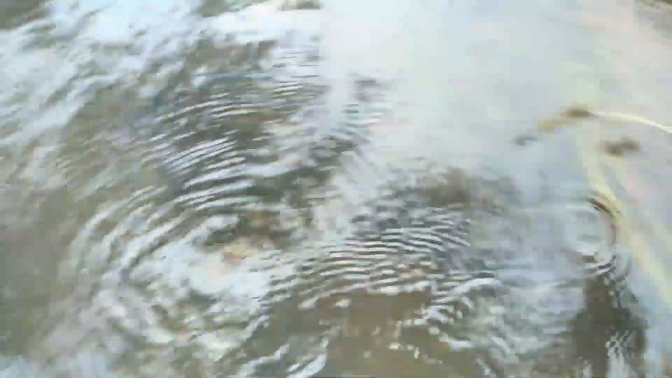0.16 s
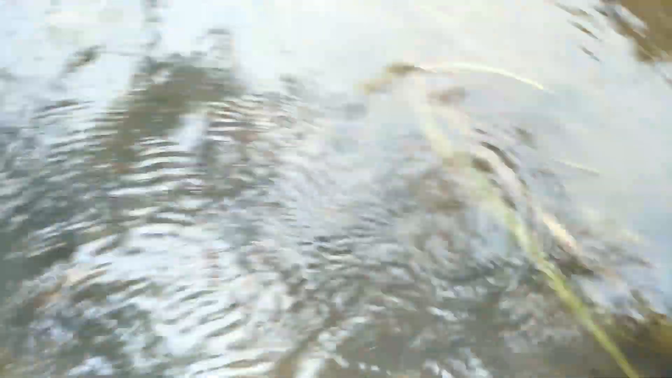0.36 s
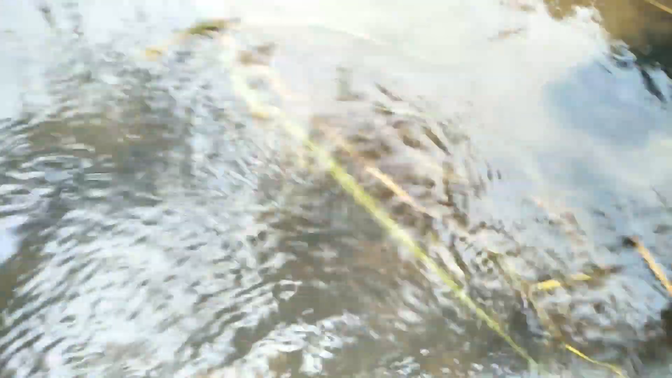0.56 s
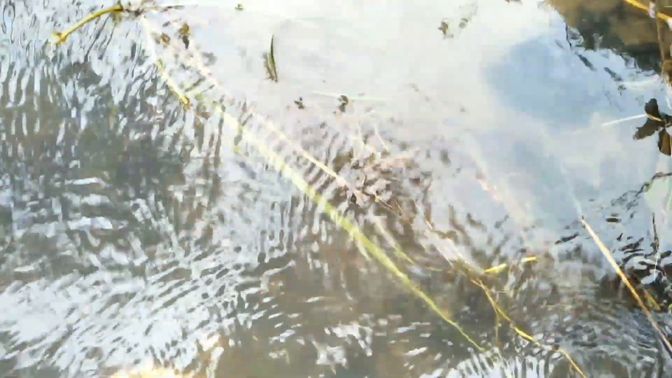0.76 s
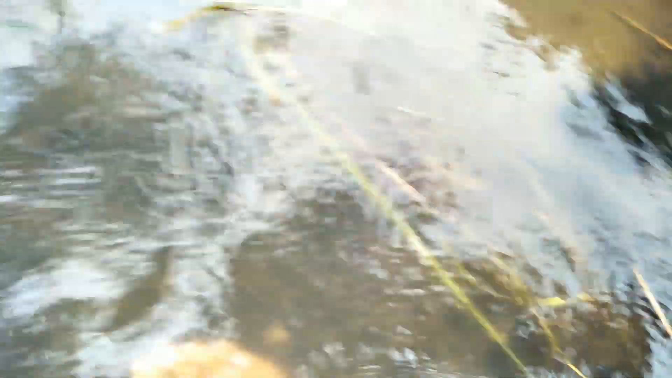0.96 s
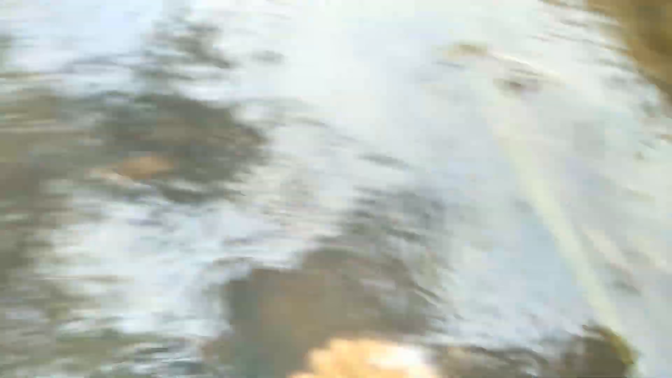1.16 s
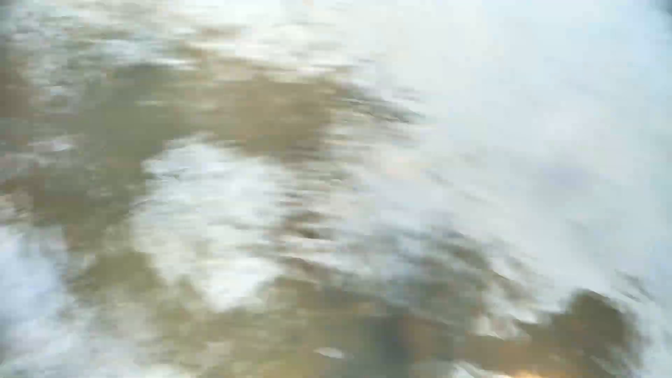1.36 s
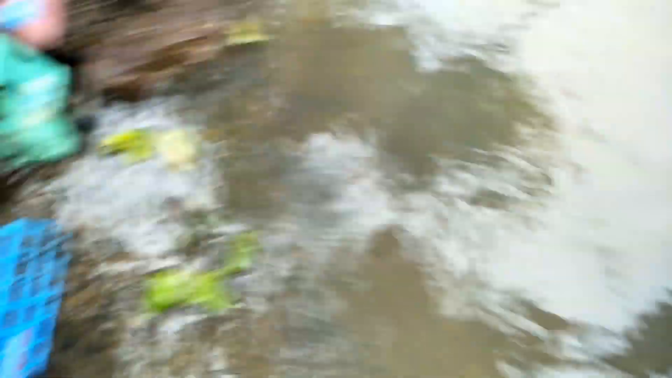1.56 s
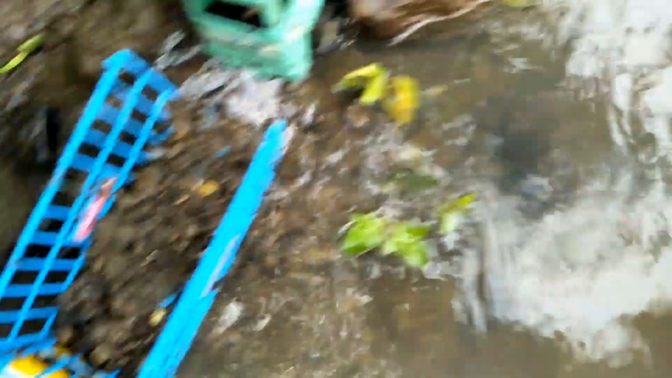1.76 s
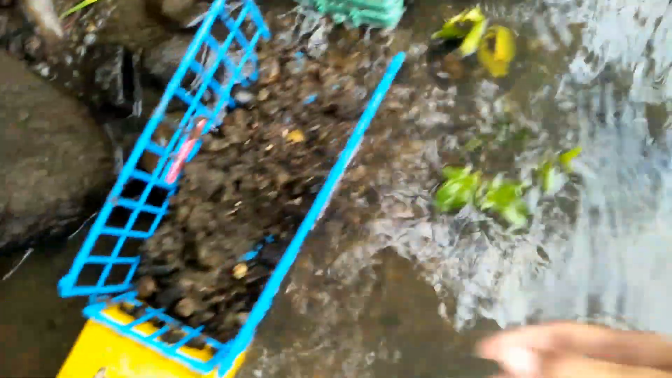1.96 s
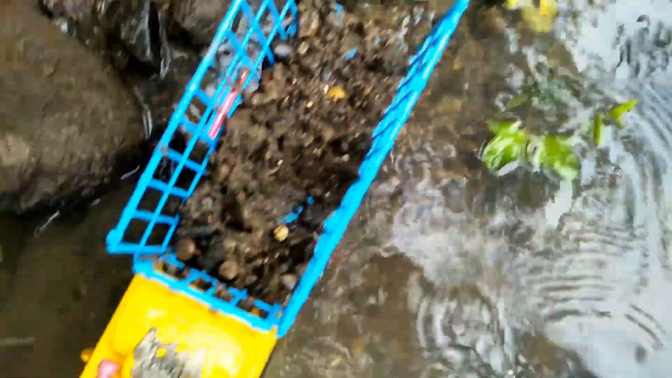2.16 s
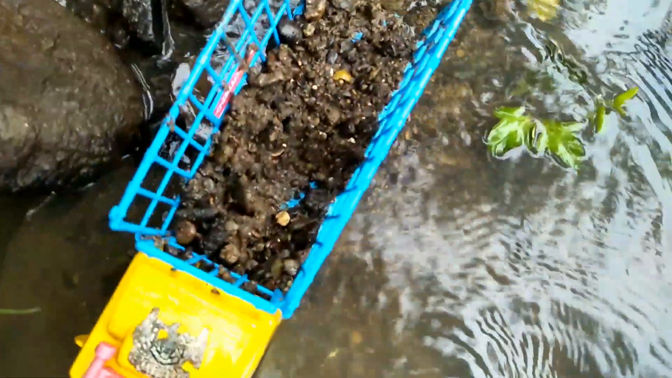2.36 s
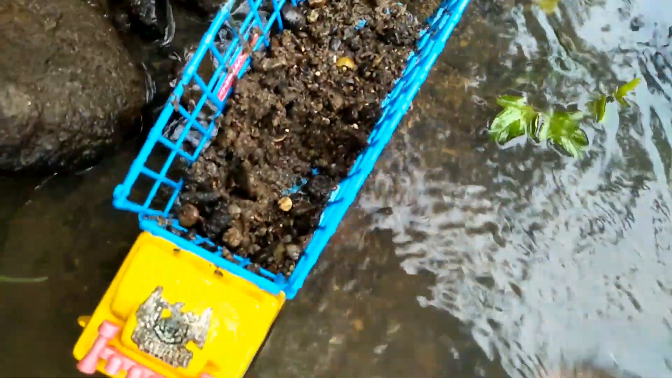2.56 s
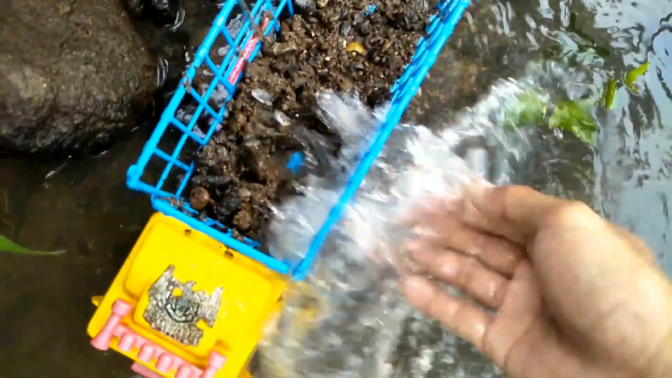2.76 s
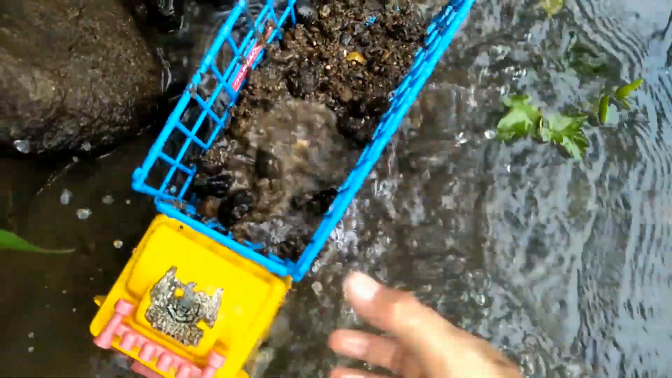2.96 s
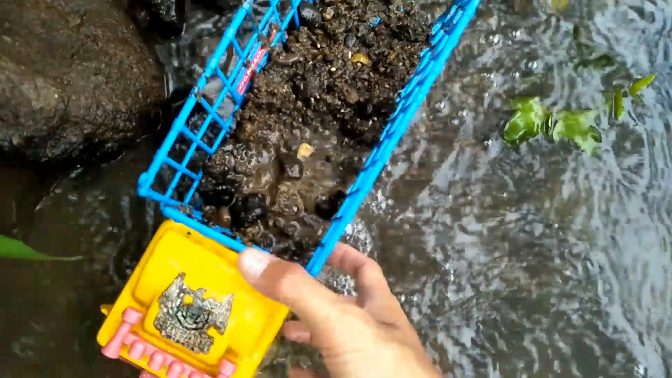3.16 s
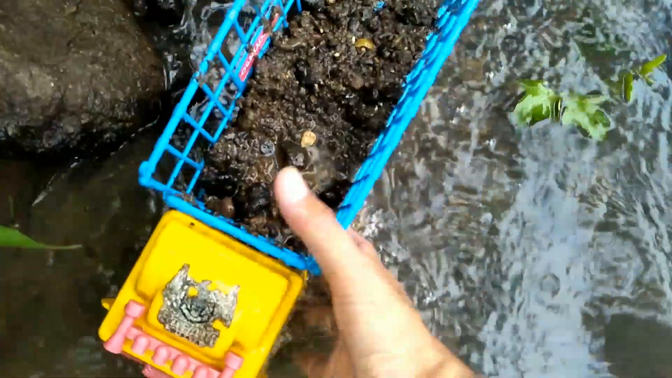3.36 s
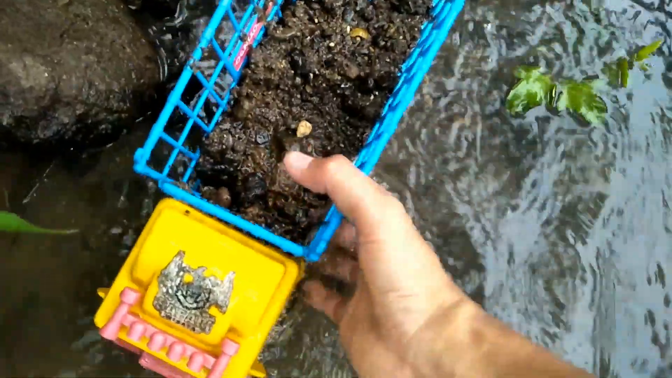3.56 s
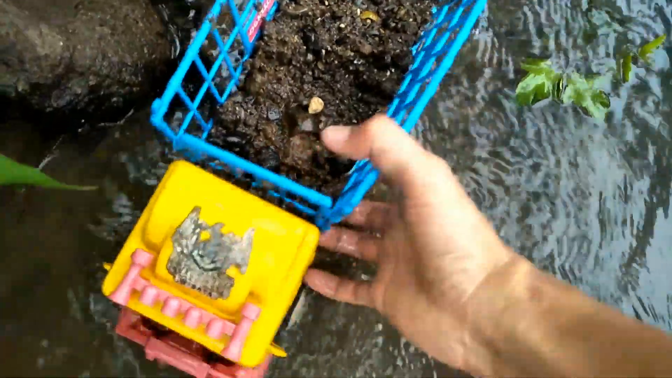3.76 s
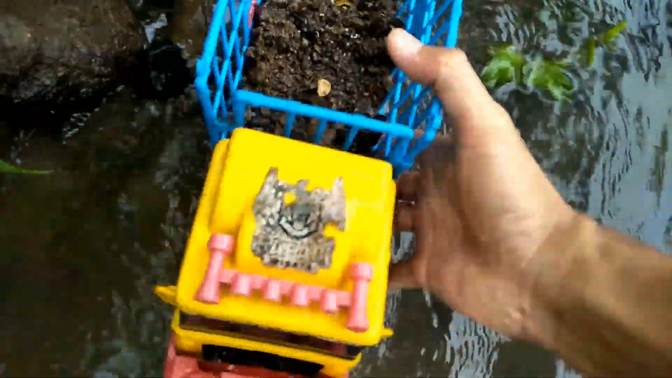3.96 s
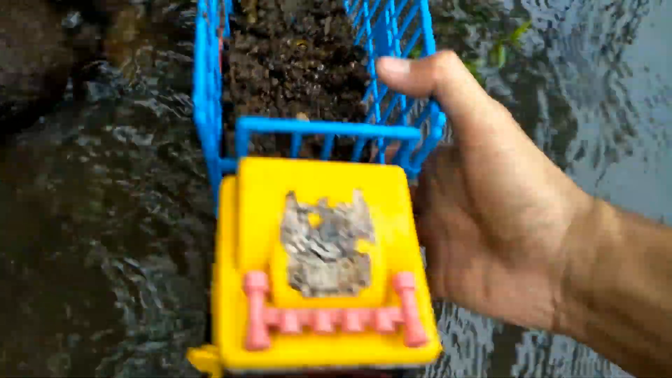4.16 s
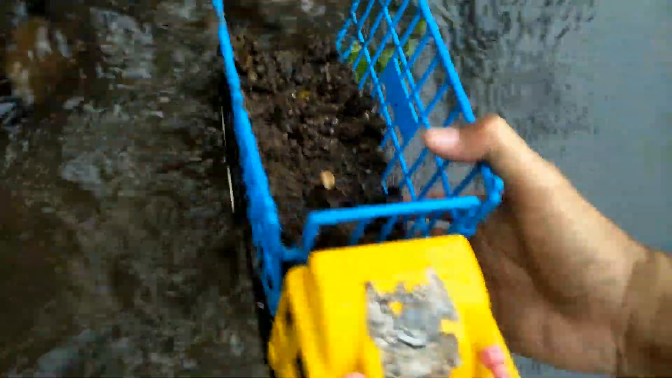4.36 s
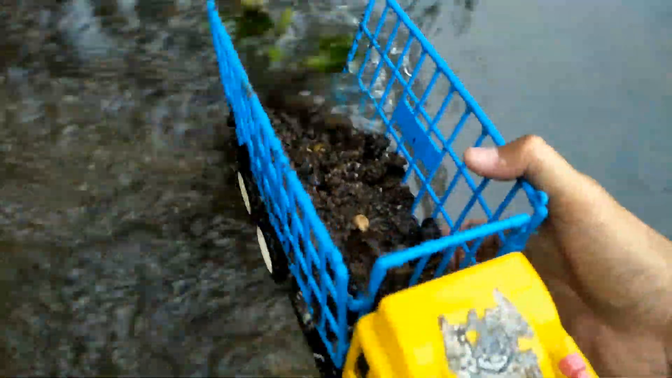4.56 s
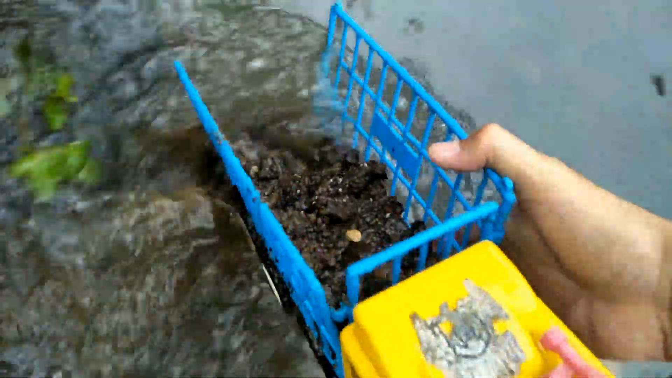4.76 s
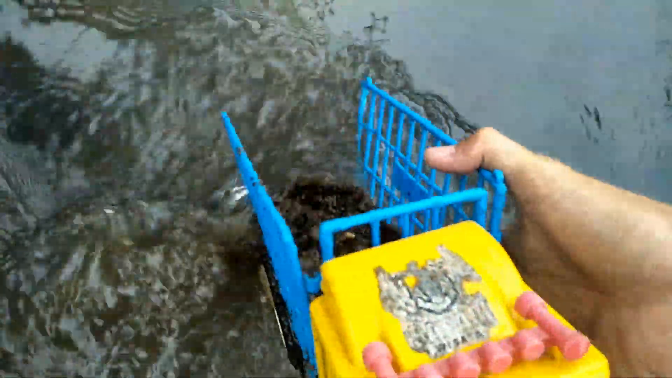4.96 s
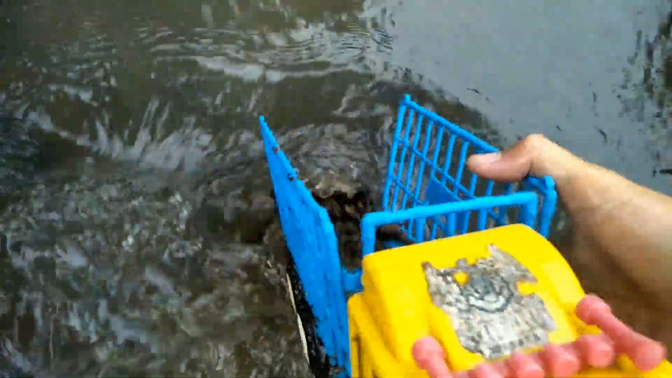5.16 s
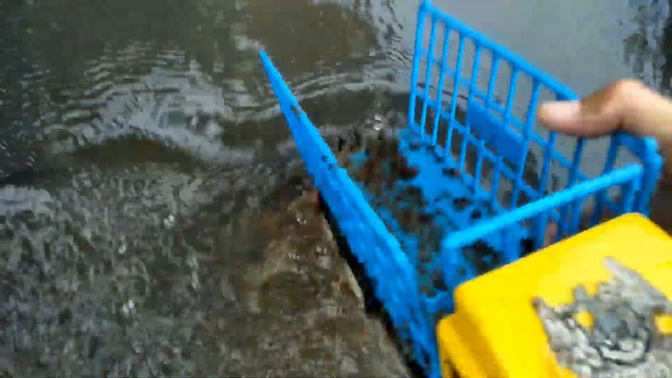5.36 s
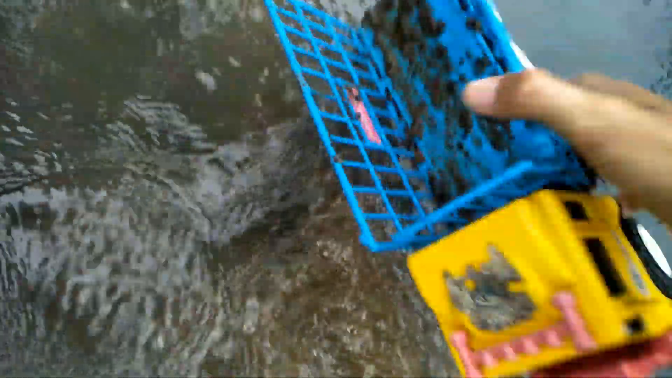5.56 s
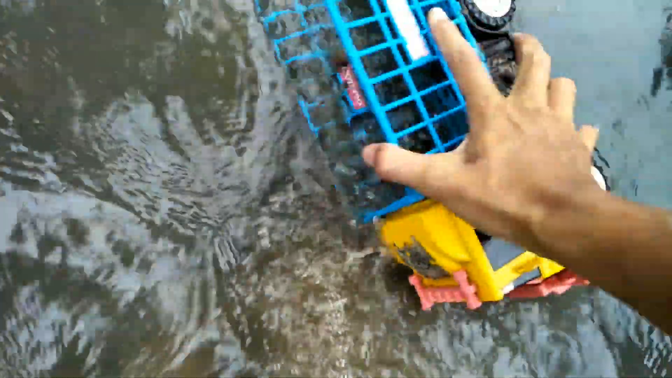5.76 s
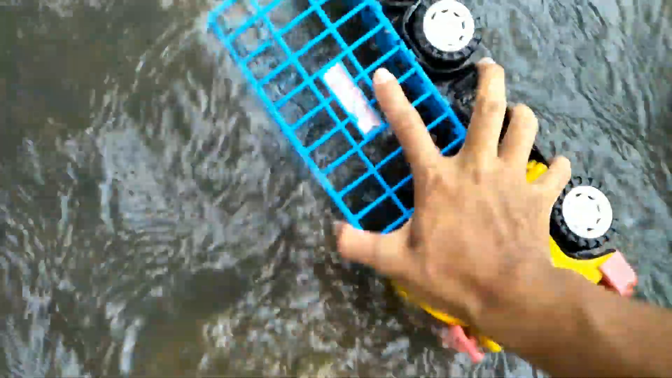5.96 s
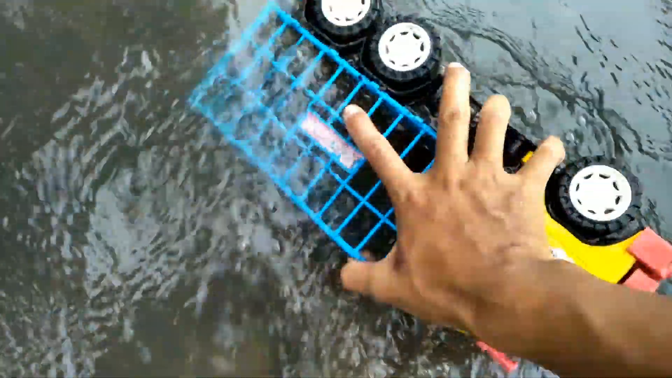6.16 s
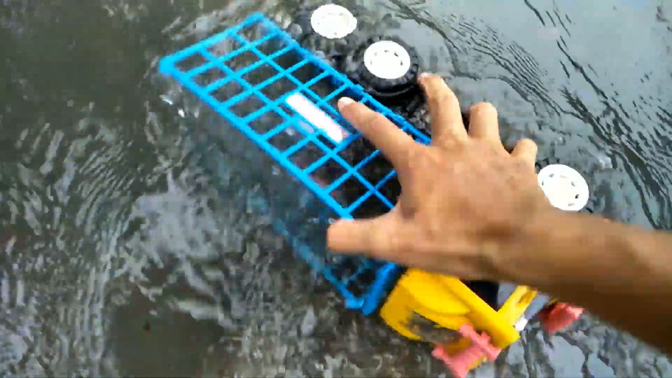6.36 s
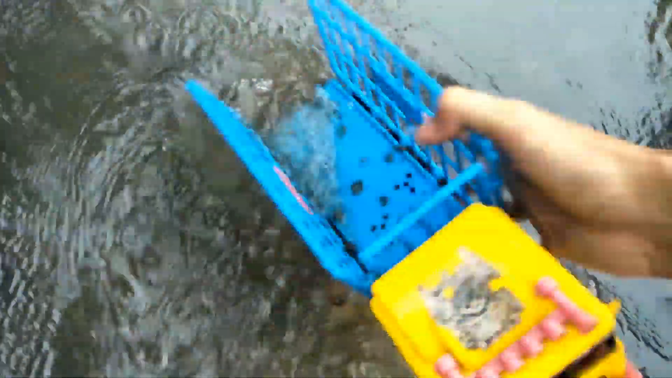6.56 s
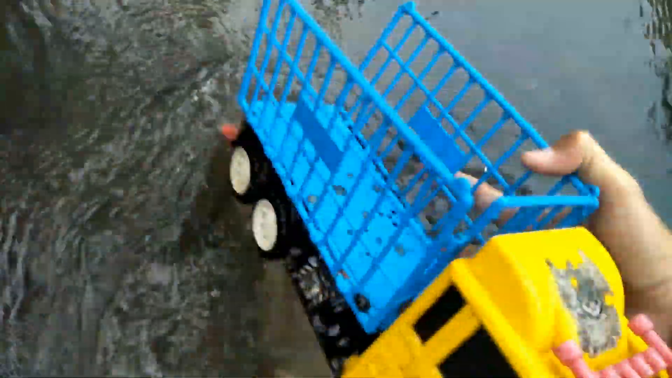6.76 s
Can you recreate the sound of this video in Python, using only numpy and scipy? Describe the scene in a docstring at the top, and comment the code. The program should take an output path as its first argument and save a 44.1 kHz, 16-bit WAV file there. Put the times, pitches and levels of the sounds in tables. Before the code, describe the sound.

Shallow stream water trickles, splashes and gurgles as a plastic toy truck is scooped over, dunked and rinsed, with hollow knocks and faint birds.

```python
"""First ripples lap in a shallow stream, under faint birds, insects, hiss and a distant rumble; then fingers bump
the camera's case at the microphone. A hand scoops water over a plastic toy truck, drags it under and rinses it.
The water is a swarm of ringing bubbles, noise and spray ticks, with deep gulps when the truck goes under.
Knocks on the case and on the truck ring decaying modes under a noise crack; the stream's banks answer."""
import sys
import numpy as np
from scipy import signal
from scipy.fft import rfft, irfft, next_fast_len
from scipy.io import wavfile
from scipy.ndimage import uniform_filter1d, map_coordinates

SR = 44100
rng = np.random.default_rng(int(sys.argv[2]) if len(sys.argv) > 2 else 0)


def master_out(mix):
    """Clip the mix to full scale and print it as 16-bit PCM to the path in sys.argv[1]."""
    frames = np.transpose(np.atleast_2d(mix))
    ceiling = np.clip(frames, -1, 1)
    pcm = np.round(ceiling * 32767).astype(np.int16)
    wavfile.write(sys.argv[1], SR, pcm)


N = 301203  # length in samples
TOP_HZ = 15800  # band limit of the camera
SPRAY_DB = -23.5  # spray against the churn, at neutral brightness
STIR_ATTACK_DB_PER_S, STIR_RELEASE_DB_PER_S = 600, 283  # how fast the water is stirred up and settles
GULP_ATTACK_DB_PER_S, GULP_RELEASE_DB_PER_S = 212, 400

# level of the distant rumble: time_s, level_db (rms)
RUMBLE_LEVELS = [(0, -43.5), (.8, -42.5), (1.049, -49.5), (1.699, -47.5), (2.9, -51), (3.2, -54.5),
                 (3.7, -50.5), (5, -51.5), (6, -45.5)]
# tone of the rumble: freq_hz, gain_db
RUMBLE_TONE = [(20, -19), (40, -6.5), (70, 3.5), (130, 2), (180, -6), (240, -23), (400, -35), (1000, -99)]
# tone of the steady hiss: freq_hz, gain_db
HISS_TONE = [(250, -7.5), (1000, 4), (3000, -6.5), (6000, -14), (11000, -14.5), (15500, -14)]
# thin far birds: start_s, length_s, pitch_hz, glide_hz_per_s, level_db (peak), trill_depth_hz
BIRD_CALLS = [(0, 0.17, 7600, -200, -63.5, 300), (.45, 0.27, 3560, -150, -61, 33),
              (0.78, 0.23, 4750, -150, -61.5, 45), (1.385, 0.44, 7650, -200, -68, 200),
              (1.694, 0.57, 7900, -200, -69.5, 110), (4.026, .14, 5400, -8000, -64, 115)]
# far insects: start_s, length_s, pitch_hz, width_hz, level_db (before the flutter of the rasp)
INSECT_BANDS = [(0, 2.9, 7530, 169, -63), (0, 7.5, 9920, 171.2, -65.5), (0, 2.3, 13140, 39.7, -66.5),
                (0.146, 0.7, 14000, 71, -60.5)]
# Moves of hand or truck through the water: ripples lap, the hand comes near and scoops, the handful lands on
# the truck and trickles off; the truck is gripped, pushed out, tips and floods, plunges in, is held under
# and lifted out: start_s, end_s, first_db, last_db (before the water's mix gain), foam_share (0-1), brightness_db
STROKES_IN_WATER = [ (0.013, 0.209, -47, -41.5, 0.34, -7.5), (1.562, 1.762, -43.5, -47, 0.13, -2.5),
                    (1.821, 2.162, -41, -42.5, 0.15, 3.5), (2.315, 2.808, -31, -33, 0.26, 2.5),
                    (2.819, 2.98, -30, -22, 0.83, 5.5), (3.033, 3.236, -43.5, -52, 0.28, 6.5),
                    (3.278, 3.83, -50.5, -49, .7, 0), (3.83, 4.64, -46.5, -40, 0.46, 0.5),
                    (4.65, 5.389, -38, -22, 0.83, 0), (5.46, 5.711, -33, -43.5, 0.08, 2),
                    (5.814, 5.95, -17.5, -27.5, 0.07, 0.5), (5.934, 6.438, -24, -32, 0.97, -6.5),
                    (6.497, 6.807, -32.5, -35.5, 0.29, 2)]
# air dragged under: start_s, end_s, first_db, last_db (before the water's mix gain)
AIR_GULPS = [(1.877, 1.93, -51, -53), (2.833, 2.98, -39, -32), (3.32, 4.696, -51.5, -53.5),
             (4.823, 5.43, -47.5, -48.5), (5.93, 6.268, -22.5, -29.5), (6.31, 6.56, -29, -42.5)]
# tone of the stirred water: freq_hz, gain_db
CHURN_TONE = [(180, -17), (300, -37), (453, -9.5), (557, 0.5), (613, 3), (743, 3.5), (951, -2), (1080, 0.5),
              (2490, -2.5), (3020, -4.5), (3970, -8.5), (4880, -25.5), (8000, -34.5), (10400, -80),
              (17600, -120)]
# tone of the gulps: freq_hz, gain_db
GULP_TONE = [(100, -24), (160, 1), (240, -6.5), (330, 0), (420, 2), (490, 4), (640, -15), (1000, -38)]
# tone of the spray: freq_hz, gain_db
SPRAY_TONE = [(2500, 6.5), (4500, 13.5), (6000, 0), (8500, -0.5), (11500, 6.5), (15500, -3)]
# big single bubbles: start_s, level_db (peak, before the plops' trim and bass cut), pitch_hz, t60_s
BIG_BUBBLES = [(.028, -27.5, 2100, .026), (.074, -28, 1060, 0.019), (.099, -27, 3800, 0.032),
               (.162, -22.5, 698, .11), (.2, -44, 2510, .05), (.271, -41.5, 4400, .02),
               (0.525, -38.5, 962, 0.2), (0.552, -38, 2470, 0.091), (1.609, -20.5, 2870, 0.0077),
               (1.755, -20, 3020, 0.0033), (1.871, -29, 1880, .07), (1.91, -15.5, 2640, 0.006),
               (1.951, -28, 570, 0.052), (2.312, -12.5, 2210, 0.0063), (2.384, -12, 916, 0.031),
               (2.391, -2.5, 2770, 0.01), (2.427, -14, 1140, 0.017), (2.452, -15, 1080, 0.023),
               (2.503, -25, 617, 0.13), (2.539, -17, 760, 0.042), (2.539, -4, 2960, 0.012),
               (2.585, -11, 1560, 0.025), (2.731, -12.5, 1710, 0.015), (2.739, -10.5, 910, 0.011),
               (2.794, -14.5, 566, .064), (2.833, -9, 332, 0.22), (2.93, -10.5, 627, 0.066),
               (2.96, -11.5, 680, 0.048), (2.97, -11, 1305, 0.055), (2.994, 0, 1880, 0.014),
               (3.11, -28.5, 750, 0.032), (3.52, -35.5, 1690, .095), (3.963, -8.5, 1136, .02),
               (4.394, -22.5, 670, 0.1), (4.511, -23, 3730, 0.015), (4.71, -19.5, 2240, 0.03),
               (4.798, -17, 650, 0.026), (5.036, -7.5, 1820, 0.0062), (5.166, -16, 685, 0.053),
               (5.224, -7.5, 2660, 0.0073), (5.243, -17, 610, 0.083), (5.335, -8, 619, 0.058),
               (5.405, -15, 479, 0.056), (5.484, -23.5, 825, 0.069), (5.614, -24, 1740, 0.034),
               (5.852, 0.5, 2980, 0.0061), (6.144, -14.5, 436, 0.082), (6.19, -15.5, 416, 0.14),
               (6.512, -4.5, 584, 0.035)]
# slaps that trap a cloud of air: start_s, level_db (dry peak), middle_pitch_hz,
# cloud_s (bubbles are freed over half of it)
AIR_SLAPS = [(0.193, -34, 1330, 0.015), (1.894, -38.5, 715, 0.036), (2.282, -34, 2090, 0.026),
             (2.376, -25.5, 1450, 0.027), (2.46, -17, 1960, 0.039), (2.537, -20, 1590, 0.031),
             (2.626, -27, 4730, 0.041), (2.929, -23, 965, 0.046), (2.99, -7.5, 1500, 0.027),
             (3.874, -30.5, 785, 0.082), (4.145, -31, 980, 0.088), (4.393, -25, 1630, 0.098),
             (5.334, -23, 1380, 0.024), (5.569, -23, 2310, 0.024), (5.815, -16, 2360, .1),
             (5.902, -22.5, 5700, 0.024), (5.877, -18, 493, .069), (5.923, -6, 760, 0.086),
             (5.926, -14.5, 252, 0.12), (6.143, -12, 740, 0.034), (6.435, -12, 920, 0.025),
             (6.51, -12.5, 1100, 0.046), (6.514, -24.5, 257, 0.11)]
# fingers bump the camera: start_s, level_db (dry peak), sharpness_db
CASE_BUMPS = [(.675, -36, 7), (.716, -40.5, -4), (.759, -39.5, -18), (.8475, -6, 11.5), (.8595, -3, -2.5),
              (.870, -4, -0.5), (.8755, -9.5, 0), (.882, -10.5, 7), (.924, -24, -1), (.9345, -9, 3),
              (.947, -27, -3), (.988, -28, -11), (1.167, -29.5, -35), (1.218, -30, -28),
              (1.2445, -15.5, -7.5), (1.255, -41, 0), (1.287, -32.5, -13), (1.294, -30.5, -21),
              (1.358, -29, -17), (1.512, -32, -7)]
# modes of the camera's case: pitch_hz, level_db (middle value), t60_s
CASE_MODES = [(847, -6, 0.044), (979, 2.5, 0.052), (1150, 1.5, 0.035), (1350, 1.5, 0.025),
              (1628, 4.5, 0.013), (2156, 4.5, 0.013), (2435, -6.5, 0.047), (3100, -20, .012),
              (3700, -20, 0.014)]
# the truck knocks against hand and stones: start_s, level_db (dry peak), sharpness_db
TRUCK_CLACKS = [(3.272, -32, 13), (3.363, -29.5, -12), (3.589, -35, 2), (3.814, -31, 2), (3.874, -27.5, 2),
                (5.747, -23, 0), (6.055, -12, -16), (6.321, -12, -13), (6.4, -16, -25), (6.435, -10, -6),
                (6.497, -20, -33), (6.632, -11.5, -13), (6.677, -13, 0), (6.724, -18.5, 0.5)]
# modes of the truck's plastic: pitch_hz, level_db (middle value), t60_s
PLASTIC_MODES = [(574, -3.5, 0.075), (914, 15.5, 0.019), (1280, -12, 0.055), (1760, 18, 0.01),
                 (2347, 11.5, 0.022), (3194, 10.5, 0.013), (3780, 11, 0.008)]
# tail of the banks: freq_hz, t60_s
BANK_DECAY = [(200, 0.63), (1000, 0.4), (3000, 0.55), (10000, 0.074)]


def amp(db):
    """Amplitude factor of a level in dB."""
    return 10 ** (np.asarray(db) / 20)


def unit(x):
    """Scale to an rms of 1."""
    return x / np.sqrt(np.mean(x ** 2) + 1e-20)


def peaked(x):
    """Scale to a peak of 1."""
    return x / (np.abs(x).max() + 1e-20)


def along(points, hz):
    """Read (Hz, value) points on a log frequency axis."""
    f, v = np.transpose(points)
    return np.interp(np.log(hz + 1), np.log(f + 1), v)


def wobble(rate):
    """A smooth random curve, rate knots a second."""
    knots = rng.standard_normal(size=4096)
    return map_coordinates(knots, [np.arange(N) * rate / SR], mode="wrap")


def coloured(x, tone):
    """Causal (minimum-phase) filter with the gain of (Hz, dB) points, made by folding the cepstrum."""
    m = 2 * next_fast_len(len(x) // 2 + 4096)
    gain = amp(along(tone, np.fft.rfftfreq(m, 1 / SR)))
    cepstrum = irfft(np.log(gain), m)
    cepstrum[1:m // 2] *= 2
    cepstrum[m // 2 + 1:] = 0
    return irfft(rfft(x, m) * np.exp(rfft(cepstrum)), m)[:len(x)]


def add(track, s, sound):
    """Mix a sound into the track at s seconds."""
    start = int(np.clip(round(s * SR), 0, N - 1))
    track[start:start + len(sound)] += sound[:N - start]


def ambience():
    """A distant low rumble over a faint steady hiss, both shaped noise."""
    rumble_db = np.interp(np.arange(N) / SR, *np.transpose(RUMBLE_LEVELS))
    rumble = unit(coloured(rng.standard_normal(N), RUMBLE_TONE))
    hiss = unit(coloured(rng.standard_normal(N), HISS_TONE))
    return amp(rumble_db) * rumble + amp(-66.5) * hiss


def birds():
    """Thin far whistles and fast trills: gliding sines whose pitch shakes 130 times a second."""
    out = np.zeros(N)
    for s, length, hz, glide, db, depth_hz in BIRD_CALLS:
        t = np.arange(int(length * SR)) / SR
        trill = np.sin(2 * np.pi * 130 * t) + 0.52 * wobble(130)[:len(t)]
        pitch = hz + glide * t + depth_hz * trill
        whistle = np.sin(2 * np.pi * np.cumsum(pitch) / SR)
        add(out, s, amp(db) * np.sin(np.pi * t / length) * whistle)
    return out


def insects():
    """Far chirring that comes and goes: slow complex noise carried on a wandering pitch makes a narrow band."""
    out = np.zeros(N)
    for s, length, hz, width_hz, db in INSECT_BANDS:
        t = np.arange(min(N, int(length * SR))) / SR
        rasp = wobble(2 * width_hz) + 1j * wobble(2 * width_hz)
        rasp = rasp * amp(-15 + 4 * wobble(9.7))
        pitch = hz + 50 * wobble(3)[:len(t)]
        carrier = np.exp(2j * np.pi * np.cumsum(pitch) / SR)
        fade = signal.windows.tukey(len(t), .2)
        add(out, s, amp(db) * fade * (rasp[:len(t)] * carrier).real)
    return out


def swell(start, end, first_db, last_db, attack, release):
    """Power of one move: it rises, grows or wanes evenly while the move lasts, then dies (slopes in dB per s)."""
    t = np.arange(N) / SR
    db = np.interp(t, [start, end], [first_db, last_db])
    db = db - attack * np.maximum(start - t, 0) - release * np.maximum(t - end, 0)
    return amp(np.maximum(db, -140)) ** 2


def bubble(t, hz, t60, rise):
    """Trapped air swells in about a cycle and rings; its pitch climbs as it nears the surface."""
    tone = np.sin(2 * np.pi * hz * t * (1 + rise * t / t60 / 2))
    return tone * amp(-60 * t / t60) * (1 - np.exp(-2 * t * hz)) ** 2


def swarm(count, low_hz, high_hz, cycles, spread_db, rise, size):
    """Bubbles of random moment, pitch, life and strength, even in level from one moment to the next."""
    when, pitch, life, strength = rng.random((count, 4)).T[:, :, None]
    hz = low_hz * (high_hz / low_hz) ** pitch
    t = np.arange(size) / SR
    t60 = np.minimum(cycles * 3 ** (life - .5) / hz, size / SR)
    rings = bubble(t, hz, t60, rise) * hz * amp(-spread_db * np.log(1.02 - strength))
    places = (when * N).astype(int) + np.arange(size)
    x = np.bincount(places.ravel(), rings.ravel(), N)[:N]
    return x / np.sqrt(np.abs(uniform_filter1d(x ** 2, SR // 10)) + 1e-12)


def water():
    """Each move through the water has its own mix of clear bubbles and dense foam, with spray;
    air dragged under gulps."""
    powers = np.array([swell(*row[:4], STIR_ATTACK_DB_PER_S, STIR_RELEASE_DB_PER_S)
                       for row in STROKES_IN_WATER])
    stirring = powers.sum(axis=0)
    # foam share and brightness of the moves, averaged by their power at each moment
    foam, bright_db = np.transpose(STROKES_IN_WATER)[4:] @ powers / stirring
    foam = np.clip(foam, 0, 1)
    gulping = sum(swell(*row, GULP_ATTACK_DB_PER_S, GULP_RELEASE_DB_PER_S) for row in AIR_GULPS)

    ringing = swarm(count=2100, low_hz=480.6, high_hz=4370, cycles=67, spread_db=5.5, rise=0.455, size=2900)
    splatter = swarm(count=9000, low_hz=439, high_hz=7030, cycles=5.75, spread_db=7.5, rise=0.11, size=600)
    clear = unit(coloured(ringing + 0.16 * splatter, CHURN_TONE))
    dense = unit(coloured(splatter + 1.57 * rng.standard_normal(N), CHURN_TONE))
    churn = np.sqrt(1 - foam) * clear + np.sqrt(foam) * dense
    # brightness lifts or dulls the treble; water over the bubbles muffles it
    treble = churn - uniform_filter1d(churn, size=13)
    churn = churn + (amp(0.86 * bright_db) - 1) * treble

    deep = swarm(count=2200, low_hz=115, high_hz=583, cycles=15.0, spread_db=-2.0, rise=0.21, size=2200)
    gulps = unit(coloured(deep, GULP_TONE))
    ticks = swarm(count=5000, low_hz=4520, high_hz=14400, cycles=7.8, spread_db=7.5, rise=0.11, size=128)
    spray = unit(coloured(ticks + 1.07 * rng.standard_normal(N), SPRAY_TONE))
    spray = spray * amp(SPRAY_DB + bright_db)
    surge_db = 3.23 * wobble(45) * (1 - .5 * foam)
    stirred = (churn + spray) * np.sqrt(stirring) * amp(surge_db)
    return amp(-3) * (stirred + gulps * np.sqrt(gulping))


def plops():
    """The biggest bubbles stand out one by one; just under the surface they radiate little bass."""
    out, t = np.zeros(N), np.arange(SR // 8) / SR
    for s, db, hz, t60 in BIG_BUBBLES:
        add(out, s, amp(db - 6.0) * peaked(bubble(t, hz, t60, rise=0.21)))
    return coloured(out, [(150, -19), (330, -10.0), (450, 0.5)])


def slaps(count=40):
    """A slap frees a cloud of short-lived bubbles that thins out quickly."""
    out, t = np.zeros(N), np.arange(SR // 6) / SR
    for s, db, middle_hz, cloud_s in AIR_SLAPS:
        delay = cloud_s / 2 * (np.arange(count) + rng.random(count))[:, None] / count
        hz = np.minimum(middle_hz * 2.34 ** rng.uniform(-0.862, 1, (count, 1)), TOP_HZ)
        rings = bubble(np.maximum(t - delay, 0), hz, 7 / hz, rise=0.18)
        cloud = rings * amp(-45 * delay / cloud_s)  # later bubbles are weaker
        add(out, s, amp(db) * peaked(cloud.sum(axis=0)))
    return out


def knocks(blows, modes, crack_db, crack_t60):
    """Each blow rings the modes at new strengths, under a short crack that soft contact dulls."""
    out, t = np.zeros(N), np.arange(SR // 8) / SR
    hz, mode_db, t60 = np.transpose(modes)[:, :, None]
    sign = (-1) ** np.arange(len(hz))[:, None]
    for s, db, sharp_db in blows:
        strength, detune = rng.standard_normal((2, len(hz), 1))
        decay = amp(mode_db + 2.0 * strength - 60 * t / t60)
        tones = np.sin(2 * np.pi * hz * (1 + 0.018 * detune) * t)
        ring = (sign * decay * tones).sum(axis=0) * (1 - np.exp(-t / 0.0011))
        contact = [(200, -8.5), (700, 5), (2600, 1.5),
                   (4500, sharp_db - 10.5), (8000, sharp_db - 26), (15000, sharp_db - 24.5)]
        crack = coloured(rng.standard_normal(len(t)) * amp(-60 * t / crack_t60), contact)
        blow = peaked(ring) + amp(crack_db) * peaked(crack)
        add(out, s, amp(db) * peaked(blow))
    return out


def scuffs(blows, weaker_db, count=3):
    """A finger never lands cleanly: weak dull touches surround each bump."""
    return [(s + lag, db - weaker_db, -10)
            for s, db, _ in blows for lag in rng.uniform(-.008, 0.019, count)]


def banks(x, near_db, far_db):
    """Water and stones scatter the sound at once; the banks add a weak tail that dies fastest in the treble."""
    hz, t, z = signal.stft(rng.standard_normal(SR // 2), SR, nperseg=256)
    decay = amp(-60 * t / along(BANK_DECAY, hz)[:, None])
    tail = signal.istft(z * decay, SR, nperseg=256)[1]
    lag = np.arange(len(tail)) / SR
    near = rng.standard_normal(len(tail)) * amp(-60 * lag / 0.056) * (lag > .002)
    echoes = amp(near_db) * near / np.linalg.norm(near) + amp(far_db) * tail / np.linalg.norm(tail)
    return x + signal.fftconvolve(x, echoes)[:N]


def scene():
    """Stream and handling, each with its own echoes, over the far birds, insects and ambience."""
    background = ambience() + birds() + insects()
    clacks = knocks(TRUCK_CLACKS, PLASTIC_MODES, crack_db=-8.5, crack_t60=0.054)
    stream = water() + plops() + slaps() + clacks
    touches = list(CASE_BUMPS) + scuffs(CASE_BUMPS, weaker_db=20.0)
    handling = knocks(touches, CASE_MODES, crack_db=-8.0, crack_t60=0.034)
    near = banks(stream, near_db=-13.5, far_db=-21) + banks(handling, near_db=-16, far_db=-29.5)
    return (near + background)[None]


def record(dry):
    """The camera keeps nothing above its band limit."""
    m = next_fast_len(N + 4096)
    kept = np.fft.rfftfreq(m, 1 / SR) < TOP_HZ
    return irfft(rfft(dry, m) * kept, m)[..., :N]


dry = scene()
out = record(dry)
master_out(out)
```